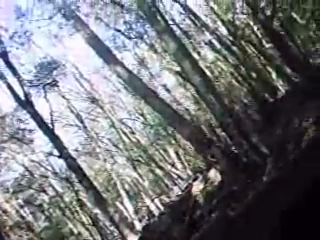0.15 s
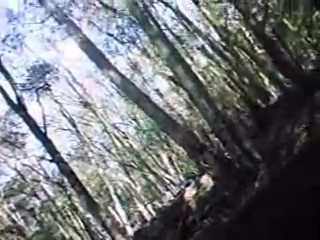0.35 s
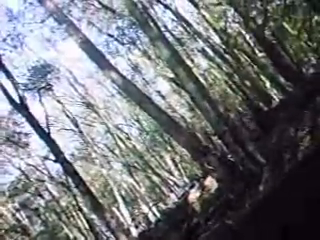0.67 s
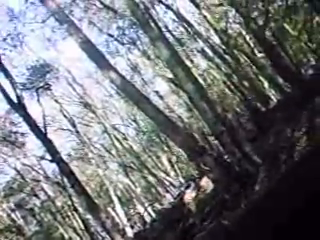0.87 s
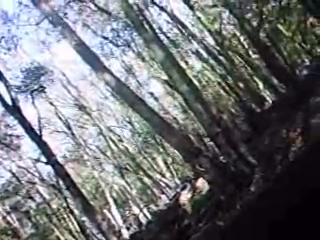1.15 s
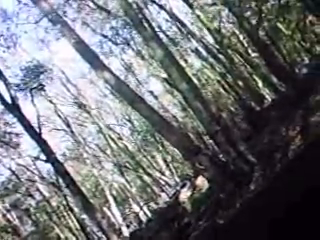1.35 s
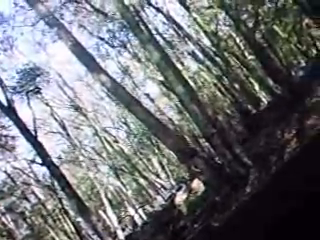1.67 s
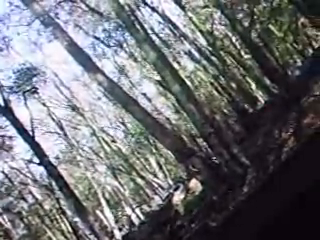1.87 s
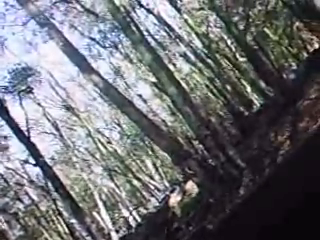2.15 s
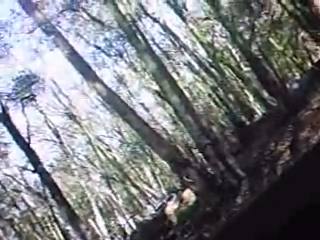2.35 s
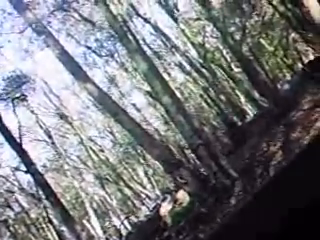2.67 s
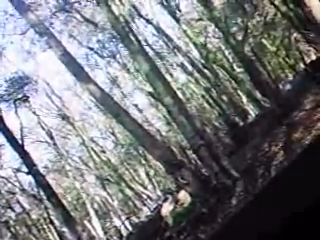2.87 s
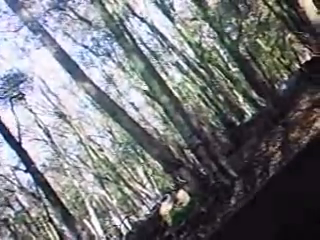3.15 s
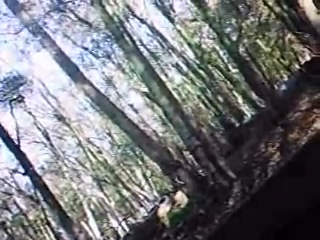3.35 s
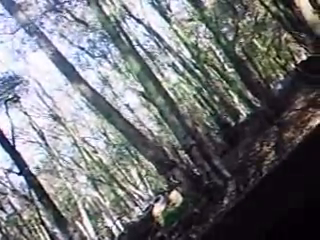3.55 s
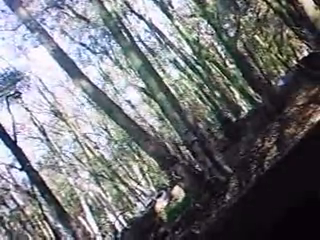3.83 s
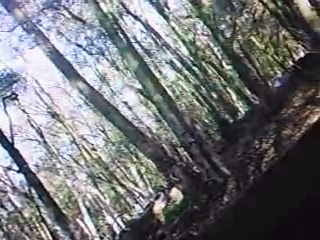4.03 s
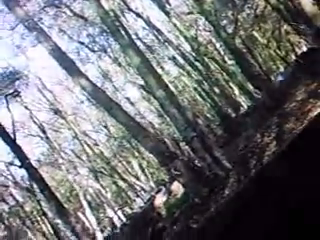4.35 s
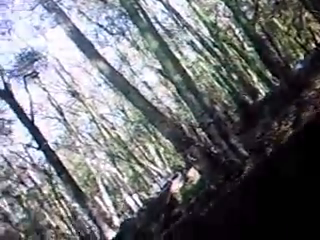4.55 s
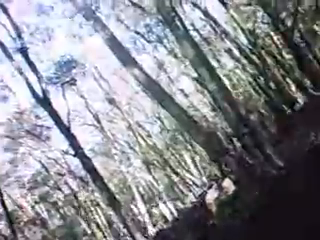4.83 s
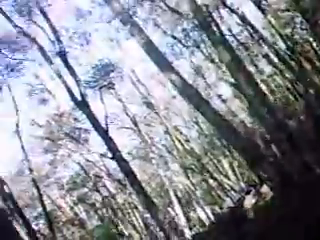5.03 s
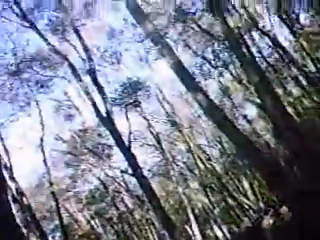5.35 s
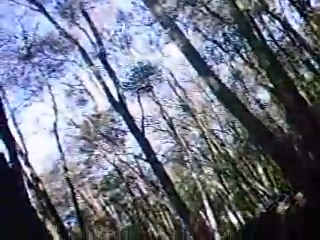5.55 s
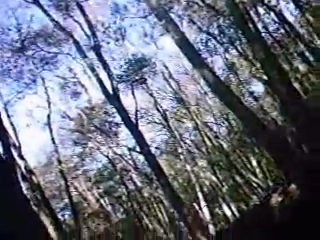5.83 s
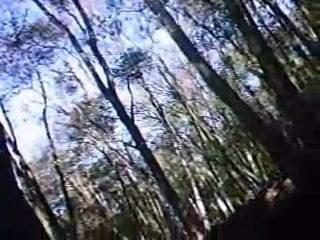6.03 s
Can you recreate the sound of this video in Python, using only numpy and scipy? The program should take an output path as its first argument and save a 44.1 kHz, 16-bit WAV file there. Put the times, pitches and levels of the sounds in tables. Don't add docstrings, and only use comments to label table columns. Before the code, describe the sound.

From the very start an electric airsoft rifle fires a long automatic burst, very close and loud. About forty-two piston slams come at roughly eleven per second, each a short, hard, gritty crack with tiny rebounds and a dull body thud, followed about 0.02 seconds later by a lighter feed-plate clack. A grinding gear whirr rattles the shell between shots, with a brief hitch near 0.3 and occasional stray clacks. Tree trunks add a short, scattered echo. The pace slackens minutely, stumbles around 3.6, and the last slam falls near 3.8; the gears die by 3.95. From 4.0 to about 6.1, small dry twig ticks, a few soft knocks and litter rustles, fullest around 4.3 to 4.8 and returning near 5.9, lie over faint air. Low camera thumps pulse unevenly at about twenty-three per second throughout, exposed after the burst. Treble is thin and noisy, peaks slightly squashed.

```python
import sys
import numpy as np
from scipy import signal
from scipy.fft import rfft, irfft
from scipy.io import wavfile
from scipy.ndimage import uniform_filter1d

SR = 44100
rng = np.random.default_rng(int(sys.argv[2]) if len(sys.argv) > 2 else 0)


def convert_level_to_amplitude(level_db):
    exponent = np.asarray(level_db, float) / 20
    return 10 ** exponent


def to_wav(s):
    ch = np.atleast_2d(s).T
    pcm = np.round(np.clip(ch, -1, 1) * 32767)
    wavfile.write(sys.argv[1], SR, pcm.astype(np.int16))


N = 273020

# (frequency [Hz], width [Hz], level [dB])
SHELL = [(709, 27, -7), (1232, 110, -6.5), (1630, 62, -8), (2170, 730, -9), (2900, 466, -1.5),
         (3712, 268, -2.5), (4274, 300, -4), (5060, 410, -6), (5600, 330, -15.5), (6940, 670, -20),
         (7940, 760, -19.5), (8540, 230, -19.5), (9200, 350, -16.5), (9830, 120, -16)]
# (frequency [Hz], width [Hz], level [dB])
BROAD = [(580, 1800, -17.5), (3550, 4100, -15)]
# (frequency [Hz], width [Hz], level [dB])
THUD = [
    [(753, 145, -2.5), (380, 380, -7.5)],
    [(1160, 310, 4), (1686, 900, 0)],
]
FIRST_SHOT_S, CYCLE_S, SHOTS = .03805, .0898, 42


def white():
    return rng.standard_normal(N)


def level(x, db):
    return x * convert_level_to_amplitude(db) / np.sqrt(np.mean(x ** 2))


def band(x, lo_hz, hi_hz, order=2):
    return signal.sosfilt(signal.butter(order, [lo_hz, hi_hz], "bandpass", fs=SR, output="sos"), x)


def ring(x, modes, blur=0.97):
    f = np.fft.rfftfreq(4096, 1 / SR)
    power = sum(convert_level_to_amplitude(db) ** 2 / (1 + (2 * (f - hz) / (w * blur)) ** 4) for hz, w, db in modes)
    cepstrum = irfft(np.log(power) / 2)
    cepstrum[1:2048] *= 2
    cepstrum[2049:] = 0
    response = irfft(np.exp(rfft(cepstrum)))
    return signal.fftconvolve(x, response / np.linalg.norm(response))[:N]


def envelope(times, dbs, rise_s, fall_s):
    marks = np.zeros(N)
    np.add.at(marks, (np.asarray(times) * SR).astype(int), convert_level_to_amplitude(np.asarray(dbs)))
    t = np.arange(4096) / SR
    shape = (1 - np.exp(-t / rise_s)) * np.exp(-t / fall_s)
    return signal.fftconvolve(marks, shape / shape.max())[:N]


def grit(rate, spread_db):
    hits = rng.random(N) < rate / SR
    size = convert_level_to_amplitude(spread_db * rng.exponential(size=N))
    return level(hits * size * white(), 0)


def walk(rate):
    k = int(SR / rate)
    quick = uniform_filter1d(uniform_filter1d(white(), k), k)
    return level(quick - uniform_filter1d(quick, 6 * k), 0)


def odd_ones(usual, odd):
    rows = np.array(usual).T.copy()
    rows[np.abs(rows[:, :1] - np.array(odd)[:, 0]).argmin(axis=0)] = odd
    return rows


def air():
    # (frequency [Hz], level [dB per Hz])
    spectrum = [(25, -19), (70, -3), (200, -3.5), (500, -6), (1000, -21), (1800, -26.5), (4000, -29.5),
                (5400, -34.5), (6300, -33.5), (8200, -32.5), (9000, -36), (10500, -28)]
    hz = np.fft.rfftfreq(N, 1 / SR)
    f, db = np.transpose(spectrum)
    shape = convert_level_to_amplitude(np.interp(np.log(hz + 1), np.log(f), db))
    calm = level(irfft(rfft(white()) * shape, N), -45)
    lumps = band(calm, 34, 450) * convert_level_to_amplitude(2.0 * walk(36))
    hiss = band(calm, 507, 11000) * convert_level_to_amplitude(1.9 * walk(27))
    return lumps + hiss


def litter():
    # (time [s], length [s], low swell [dB], high swell [dB])
    stirs = [
        (4.342, .05, 5, -1),
        (4.45, .04, -7, 4.5),
        (4.57, .1, 0, 5.5),
        (4.773, 0.11, 3, 2),
        (5.3, 0.33, -5, -3),
        (5.9, 0.2, 3.5, 0.5),
    ]
    s, long_s, low_db, high_db = np.transpose(stirs)
    stir = np.exp(-((np.arange(N)[:, None] / SR - s) / long_s) ** 2)
    low = level(ring(grit(3000, 1.9), THUD[1], blur=1.0), -2)
    high = level(ring(grit(3000, 1.9), SHELL[4:8] + BROAD[1:], blur=1.0), -2)
    return low * convert_level_to_amplitude(-64.5 + stir @ low_db) + high * convert_level_to_amplitude(-60 + stir @ high_db)


def twigs():
    # (time [s], peak [dB], frequency [Hz])
    ticks = [(4.022, -33.5, 3200), (4.118, -39, 3680), (4.253, -34, 3670), (4.4, -39, 2800),
             (4.4475, -36.5, 3670), (4.494, -37, 3670), (4.563, -41, 2990), (4.681, -39.5, 3690),
             (4.774, -50, 3020), (4.8508, -45, 3160), (4.916, -39, 4150), (5.1237, -43, 3560),
             (5.1571, -40, 2880), (5.2494, -48, 3160), (5.3236, -40, 3800), (5.5312, -45, 3150),
             (5.6619, -44, 3790), (5.7228, -39.5, 4150), (5.8136, -48, 3050), (5.8774, -39, 4400),
             (5.9054, -43, 3090), (6.031, -34, 3530)]
    # (time [s], peak [dB], frequency [Hz])
    knocks = [
        (4.059, -43, 960),
        (4.351, -41, 970),
        (4.757, -39, 1300),
        (5.769, -48, 1020),
    ]
    out = np.zeros(N)
    t = np.arange(600) / SR
    for s, peak_db, tick_hz in ticks + knocks:
        burst = band(rng.standard_normal(600), 0.86 * tick_hz, 1.28 * tick_hz)
        tick = burst * np.exp(-t * tick_hz / 13.0)
        i = int(s * SR)
        out[i:i + 600] += convert_level_to_amplitude(peak_db - 4.5) * tick[:N - i] / np.abs(tick).max()
    return out


def trees(x):
    t = np.arange(int(.5 * SR)) / SR
    tail = rng.standard_normal(len(t)) * np.exp(-np.log(1000) * t / 0.5) * (t > .006)
    return convert_level_to_amplitude(-16.5) * signal.fftconvolve(x, tail / np.linalg.norm(tail))[:N]


def writes():
    # (time [s], peak [dB], half width [ms])
    thumps = [(0.042, -20, 2.3), (0.221, -25, 1.6), (0.2554, -31, 2.2), (0.4684, -27, 2.2),
              (0.8521, -25.5, 0.25), (0.9438, -22.5, 1.8), (1.162, -34, 1.9), (1.212, -22.5, 1.4),
              (1.4835, -23, 1.4), (2.511, -46, 1.3), (2.9832, -27, 2.4), (3.399, -25, 1.5),
              (3.4909, -21.5, 0.75), (3.5378, -24.5, 2.1), (3.8416, -28, 3.3), (4.6918, -26, 2.3),
              (4.74, -26, 2.9), (4.7846, -22.5, 1.9), (4.8226, -26.5, 1.6), (5.1262, -24.5, 2.5),
              (5.302, -22.5, 2.35), (5.3446, -26, 3), (5.393, -35, 2.9), (5.736, -23.5, 2.5),
              (5.783, -38.7, 2.0), (5.9947, -27.5, 2.4), (6.0813, -21.5, 2.3), (6.1263, -24.5, 2.4),
              (6.1652, -37.7, 1.8)]
    # (time [s], drift [ms], swing [dB])
    clock = [(.04, 2.5, 0.5), (.47, 5.5, 1.5), (1.02, 8.5, 1), (1.24, 3.5, 1.5), (2.43, -5, 3.5),
             (2.95, -6, 1.5), (3.29, -6, 2), (3.46, -7, 1), (3.63, -4, 1.5), (4.10, -1.5, 0.9),
             (4.57, -6, 4.5), (4.91, -3, -3), (5.08, 0, -2), (5.21, 1.5, 2), (5.43, 3.5, -2),
             (5.68, 6, -1.8), (5.81, 11, 2.2), (6.15, 15, 3)]
    count, start_s, cycle_s = 144, .0375, .04277
    k = np.arange(count)
    s = start_s + cycle_s * k
    at, drift_ms, swing_db = np.transpose(clock)
    a, b, c = rng.standard_normal((count, 3)).T
    extra_db = np.interp(s, at, swing_db) * np.where(k % 2, 1, -1) + 0.9 * a
    late_ms = np.interp(s, at, drift_ms) + .5 * extra_db + 0.67 * b
    width_ms = np.clip(1.91 + 0.2 * extra_db + 0.27 * c, .8, 3)
    return odd_ones([s + late_ms / 1000, -26.5 + extra_db, width_ms], thumps)


def write_cycle():
    out, gate = np.zeros(N + 2048), np.zeros(N + 2048)
    t = np.arange(-1024, 1024) / SR * 1000
    rows = writes()
    for (s, db, ms), (a, b, c) in zip(rows, rng.random((len(rows), 3))):
        def bump(at, w):
            return np.exp(-.5 * ((t - at * ms) / (w * ms)) ** 2)
        before = (0.033 + 0.27 * a + 0.93 / ms) * bump(-1.5 - 0.59 * c, 0.58)
        after = (0.092 + 0.36 * b) * bump(1.64, 0.89)
        i = int(s * SR)
        out[i:i + 2048] += convert_level_to_amplitude(db) * (1.044 * bump(0, 0.31) - before - after)
        gate[i:i + 2048] += np.exp(-.5 * ((t + 1.9) / 6.2) ** 2) * (0.67 + 0.39 * c)
    fizz = level(band(white(), 7450, 8550, order=4), -60.5)
    fizz += level(band(white(), 300, 610, order=1), -51)
    return out[1024:1024 + N] + gate[1024:1024 + N] * fizz


def shots():
    # (time [s], peak [dB], body thud [dB against the crack], low thud [dB against the crack])
    slams = [(0.0399, -1, -18, -32), (0.1308, -2, -17, -18), (0.3202, -8, -22, -26), (0.4006, 0, -19, -22),
             (0.5773, -2, -31, -24), (0.7566, -3, -21, -36), (0.848, -3, -21, -17.5),
             (1.2111, -3, -17, -23), (2.2114, -2.5, -18, -20.5), (2.6685, -1, -27, -21),
             (3.036, -5, -12.5, -17), (3.125, -5.5, -17, -16.5), (3.3992, -1.5, -19, -19.5),
             (3.4893, -3, -15, -22.5), (3.5859, -3.5, -18, -40), (3.679, -7, -16.5, -13),
             (3.7837, -5.5, -17, -38)]
    sag_s = 3.17e-5
    k = np.arange(SHOTS)
    a, b, c = rng.standard_normal((SHOTS, 3)).T
    s = FIRST_SHOT_S + CYCLE_S * k + sag_s * k * k
    return odd_ones([s, -2.5 + 0.17 * a, -21.5 + 1.0 * b, -24 + 1.0 * c], slams)


def gear_load(cycle):
    # (time [s], level [dB])
    gears = [(0.005, -22), (0.1, -24.5), (0.27, -25), (0.3, -27.5), (0.335, -25), (0.46, -25), (0.7, -24.5),
             (1.1, -25.5), (1.6, -24), (2.6, -24), (3.0, -24), (3.55, -24.5), (3.735, -22), (3.762, -29.5),
             (3.8, -23.5), (3.83, -31.5), (3.9, -42.5), (3.98, -75)]
    # (share of cycle [0-1], level [dB])
    stroke = [(0, -3.5), (.12, -1), (.19, -4), (.24, 0), (.33, -2.5), (.82, -2), (.91, -5), (1, -3)]
    burst_db = np.interp(np.arange(N) / SR, *np.transpose(gears), right=-120)
    return burst_db + np.interp(cycle, *np.transpose(stroke))


def piston_slam(s, db):
    # (delay [ms], level [dB])
    bounces = [
        (1.0, 1),
        (1.7, -4.5),
        (2.599, -3.5),
        (3.4, -7),
        (4.998, -4),
    ]
    slam = envelope(s, db - 13.0, 0.00037, 0.003) * grit(12000, 0.42)
    for ms, rel_db in bounces:
        c = rng.standard_normal(len(s))
        i = ((s + ms / 1000 + .00015 * c) * SR).astype(int)
        slam[i] += convert_level_to_amplitude(db + rel_db + 3.5) * np.where(c > -.6, -1, 1)
    return slam


def feed_clack(s):
    # (time [s], peak [dB])
    clacks = [(0.0808, -14), (0.1003, -8.5), (0.504, -21), (0.7017, -13), (1.1485, -16), (1.1594, -11.5),
              (1.269, -7), (1.415, -20), (1.515, -8.5), (1.5957, -17), (1.6842, -8), (2.595, -12),
              (2.8803, -16), (3.0047, -19), (3.056, -16), (3.148, -12), (3.5126, -14), (3.5493, -12),
              (3.6066, -17), (3.7427, -8)]
    lag_s = .0195
    feed = np.transpose([s + lag_s, -11 + 2.5 * rng.standard_normal(len(s))])
    times, peaks_db = np.vstack([feed[:-1], clacks]).T
    return envelope(times, peaks_db, 0.00077, 0.0036) * convert_level_to_amplitude(-11.5) * grit(14000, 0.44)


def rifle():
    s, db, body_db, low_db = shots().T
    cycle = np.interp(np.arange(N) / SR, s, np.arange(len(s))) % 1
    load_db = gear_load(cycle)
    teeth = convert_level_to_amplitude(load_db + 1.1 * walk(87) + 0.42) * (0.78 * grit(2500, 0.69) + 0.71 * white())
    panels = band(teeth, 400, 2700) * (convert_level_to_amplitude(0.95 * walk(35) - 3.5) - 1)
    tooth = np.diff(np.floor(cycle * 15 + .3 * walk(150)), prepend=0) > 0
    sector = tooth * convert_level_to_amplitude(load_db + 19.0 + 1.7 * white()) * (cycle > .2)
    out = ring(teeth + panels + feed_clack(s), SHELL + BROAD)
    out += ring(piston_slam(s, db), SHELL + BROAD, blur=1.4)
    out += ring(sector, SHELL[5:7], blur=1.17)
    for modes, rel_db in zip(THUD, (low_db, body_db)):
        out += envelope(s, db + rel_db - 5.5, 0.0014, 0.0064) * ring(white(), modes)
    pickup = envelope(s[:-1] + 0.033, db[:-1] - 35, .0015, 0.004)
    return out + pickup * ring(white(), THUD[0][:1] + THUD[1][:1])


def scene():
    background = air() + litter() + twigs()
    gun = rifle()
    return (background + trees(gun) + write_cycle() + gun)[None]


def thin_treble(x):
    # (frequency [Hz], step [multiple of local level])
    coarse = [(1200, 0), (1500, 1.2), (1900, 0), (5300, 0), (5800, 2.2), (6500, 3.6), (6950, 2.4),
              (7400, 3.6), (8100, 1.6), (8800, 3.0), (9300, 2.8), (9700, 7.0)]
    hz, _, z = signal.stft(x, SR, window="cosine", nperseg=2048)
    patch = rng.random((len(hz) // 16 + 1, z.shape[1])).repeat(16, axis=0)[:len(hz)]
    local = uniform_filter1d(uniform_filter1d(np.abs(z), size=21, axis=0), size=3, axis=1)
    step = np.interp(hz, *np.transpose(coarse))[:, None] * (.5 + 1.2 * patch) * local + 1e-12
    step += convert_level_to_amplitude(-108) * (.5 + patch) * (hz > 5300)[:, None]
    kept = (step * np.round(z / step) + convert_level_to_amplitude(-55) * z) * (hz < 10480)[:, None]
    return signal.istft(kept, SR, window="cosine", nperseg=2048)[1][:N]


def fake_treble(x):
    # (low edge [Hz], high edge [Hz], level [dB against the middle band], floor [dB])
    fill = [
        (11185, 12000, -18, -91),
        (12000, 14530, -19.5, -76),
        (14550, 15800, -38, -99),
        (5850, 11150, -33, -100),
    ]
    # (time [s], length [s])
    starved = [(0, .032), (.231, .08), (.415, .025), (.67, .071), (.773, .064), (.869, .048), (1.059, .036),
               (1.235, .03), (1.607, .142), (1.78, .065), (1.958, .041), (2.244, .063), (2.502, .051),
               (2.62, .04), (2.856, .063), (3.137, .069), (3.332, .036), (3.458, .034), (3.72, .04),
               (3.855, .012), (3.91, 2.4)]
    follow = np.sqrt(uniform_filter1d(band(x, 2770, 3900) ** 2, 700) + 1e-12)
    blinks = FIRST_SHOT_S + 0.028 + CYCLE_S * np.flatnonzero(rng.random(SHOTS) < .3)
    shut = np.ones(N)
    for start_s, long_s in starved + [(s, 0.0085) for s in blinks]:
        shut[int(start_s * SR):int((start_s + long_s) * SR)] = convert_level_to_amplitude(-17)
    shut = uniform_filter1d(shut, 150)
    f = np.fft.rfftfreq(N, 1 / SR)
    out = np.zeros(N)
    for k, (lo_hz, hi_hz, rel_db, floor_db) in enumerate(fill):
        noise = level(irfft(rfft(white()) * (f > lo_hz) * (f < hi_hz), N), 0) * convert_level_to_amplitude(1.4 * walk(28))
        gain = follow * convert_level_to_amplitude(rel_db) * (shut if k == 1 else 1)
        out += noise * (gain + convert_level_to_amplitude(floor_db))
    return out


def top_cut(x):
    return signal.sosfilt(signal.butter(12, 15730, fs=SR, output="sos"), x)


def record(dry):
    x = signal.sosfilt(signal.butter(2, 25, "highpass", fs=SR, output="sos"), dry[0])
    x = np.tanh(1.225 * x) / 1.063
    mix = thin_treble(x) + fake_treble(x)
    return top_cut(mix[None])


dry = scene()
out = record(dry)
to_wav(out)
```